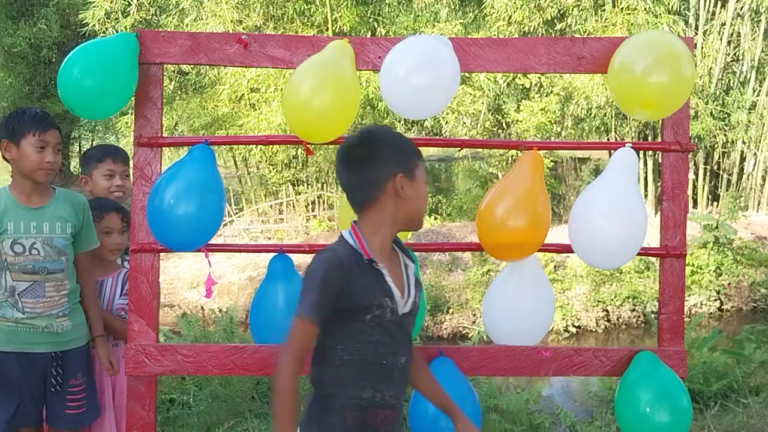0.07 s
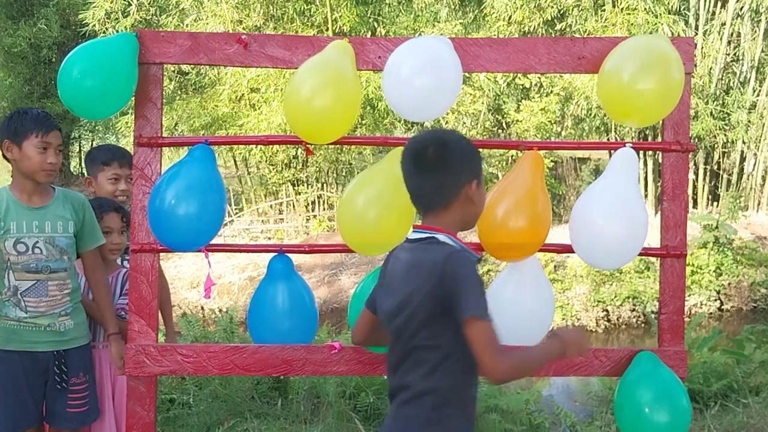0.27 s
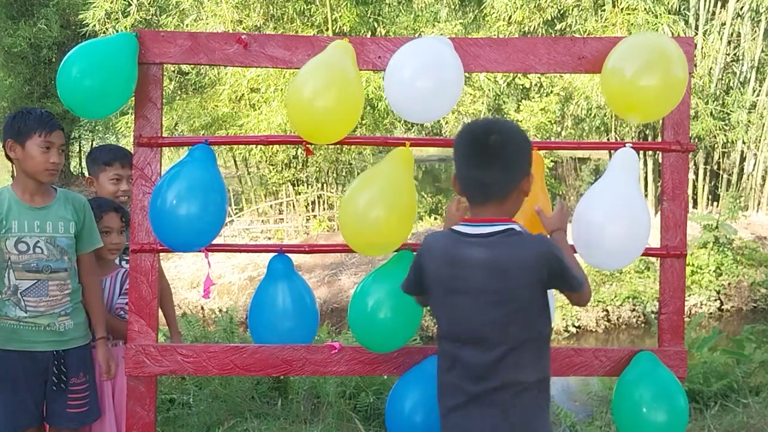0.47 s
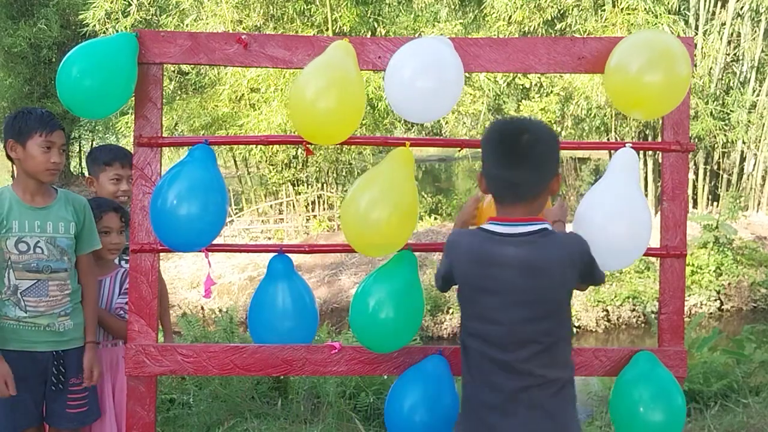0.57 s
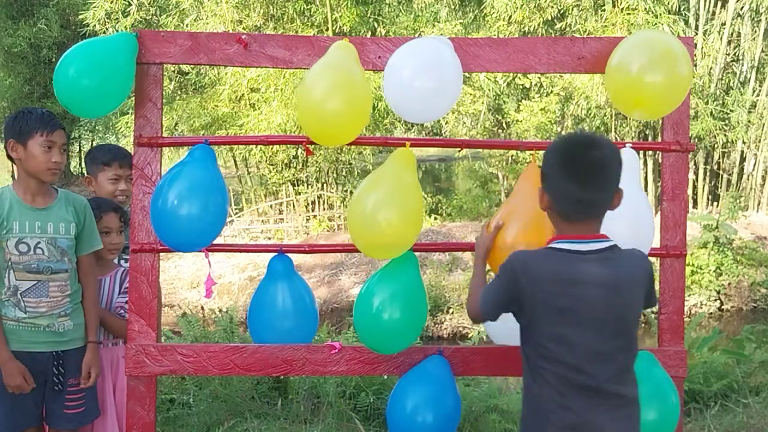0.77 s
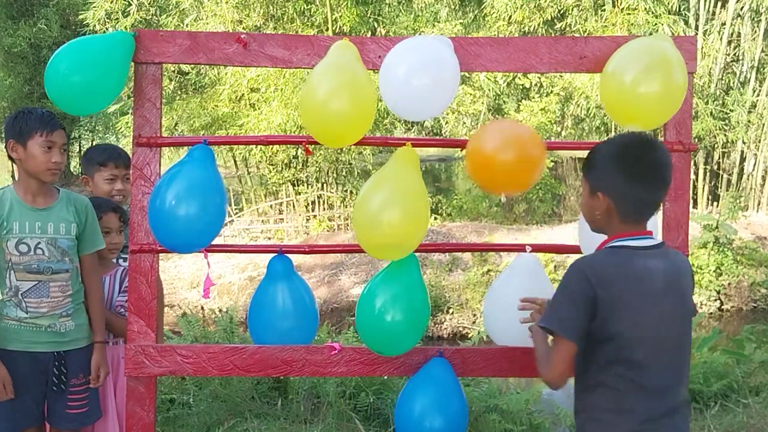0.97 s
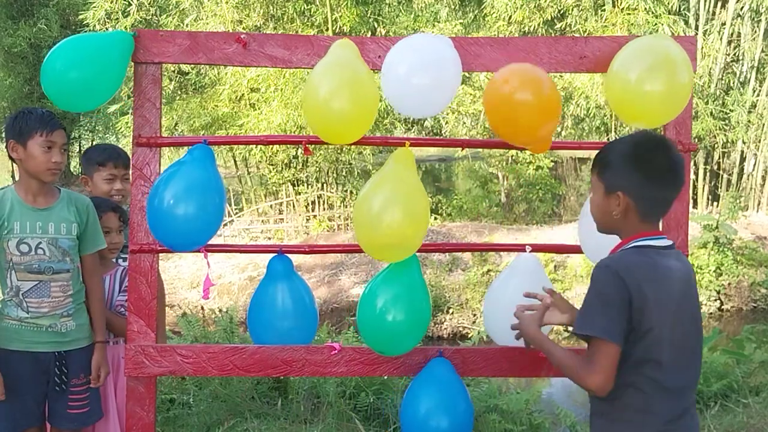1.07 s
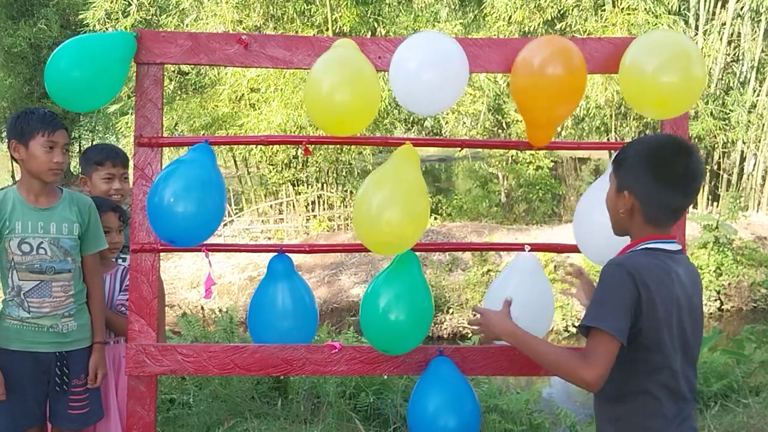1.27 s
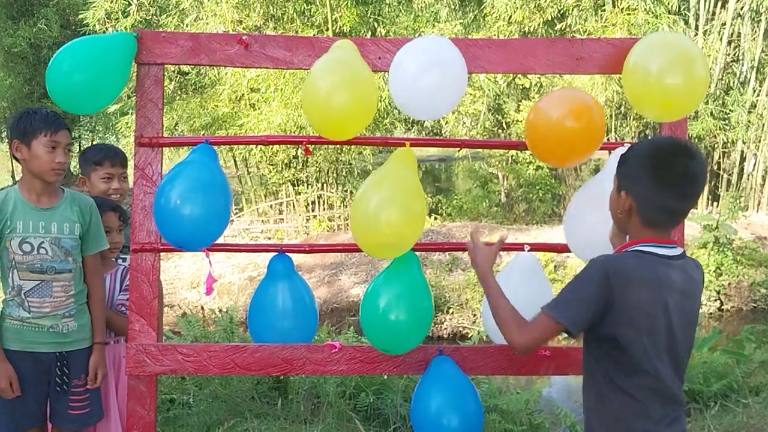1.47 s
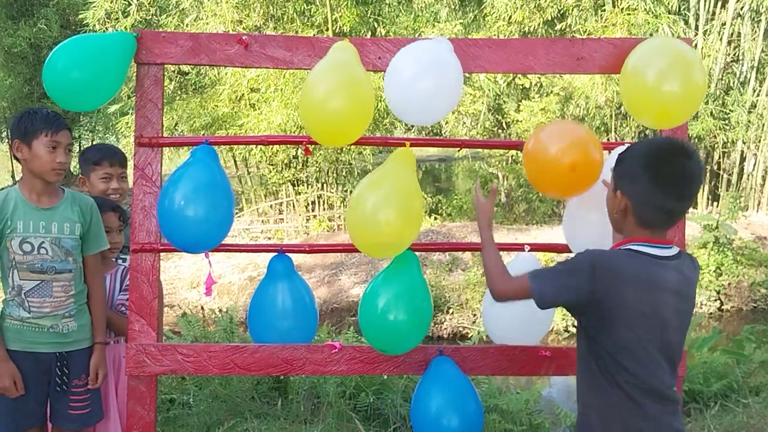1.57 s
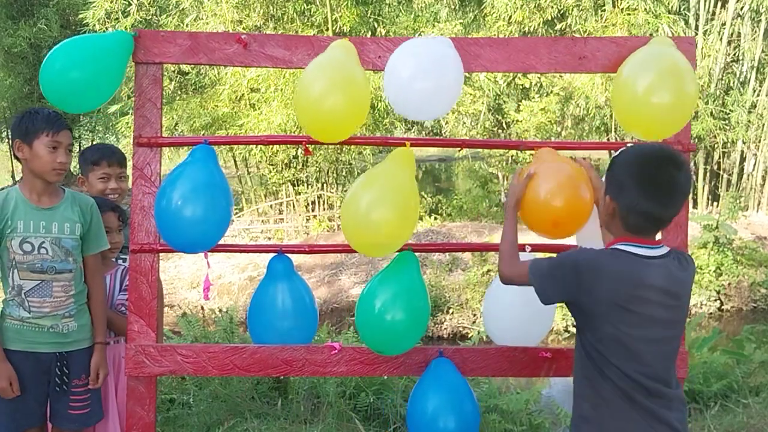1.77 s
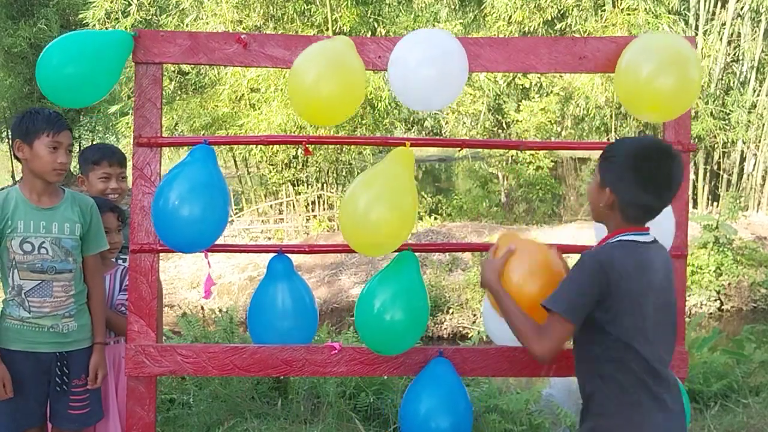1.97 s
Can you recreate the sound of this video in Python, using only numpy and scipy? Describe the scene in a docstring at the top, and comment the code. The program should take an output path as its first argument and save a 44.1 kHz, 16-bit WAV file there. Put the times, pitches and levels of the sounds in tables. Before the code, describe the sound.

A balloon bursts with one sharp, thumping pop and a quick echo at about 2 seconds, much louder than everything else. Before it comes a small rubber squeak at the start, then soft hollow taps and rubbing from 0.5 to 0.8 seconds and from 1 to 1.8. Clothes swish and a foot lands softly near 1 second. Faint insects, a distant bird and a low outdoor rumble lie behind.

```python
"""A rubber balloon is batted and rubbed on a wooden frame outdoors, then squeezed until it bursts.
The pop is a falling thump of released air with a tearing crack and quick echoes off ground and frame.
Before it, a child's taps ring the balloon softly, rubber sticks and slips, clothes swish, a foot lands.
Insects, a far bird and a low rumble are faint behind."""
import sys
import numpy as np
from scipy import signal
from scipy.fft import rfft, irfft, next_fast_len
from scipy.io import wavfile

SR = 44100
rng = np.random.default_rng(int(sys.argv[2]) if len(sys.argv) > 2 else 0)


def generate_wav(signal):
    """Clip the signal to [-1, 1] and save it as 16-bit WAV at the path in sys.argv[1]."""
    frames = np.transpose(np.atleast_2d(signal))
    scaled = np.clip(frames, -1, 1) * 32767
    pcm = np.round(scaled).astype(np.int16)
    wavfile.write(sys.argv[1], SR, pcm)


N = 88420

POP_S = 1.9715
SKIN_HZ = 768.5


def amp(db):
    """Decibels to gain."""
    return 10 ** (np.asarray(db) / 20)


def unit(x):
    """Scale to rms 1."""
    return x / np.sqrt(np.mean(x ** 2) + 1e-20)


def along(points, hz):
    """Interpolate (Hz, value) points on a log axis."""
    knots_hz, values = np.transpose(points)
    return np.interp(np.log(hz + 1), np.log(knots_hz + 1), values)


def since(start_s):
    """Seconds after the start, zero before."""
    return np.maximum(np.arange(N) / SR - start_s, 0)


def level(points):
    """Gain per sample from (s, dB) points."""
    return amp(np.interp(since(0), *np.transpose(points)))


def strokes(rows):
    """A half-sine swell per (start s, length s, dB) row."""
    return sum(amp(db) * np.sin(np.pi * np.minimum(since(s) / length_s, 1)) for s, length_s, db in rows)


def burst(start_s, db, decay_s):
    """Instant onset, exponential decay."""
    t = since(start_s)
    return amp(db) * (t > 0) * np.exp(-t / decay_s)


def filtered(x, response):
    """Apply a gain given as a function of Hz."""
    size = next_fast_len(N + SR // 2)
    return irfft(rfft(x, size) * response(np.fft.rfftfreq(size, 1 / SR)), size)[..., :N]


def noise(colour, grain=1):
    """Coloured stereo noise of rms 1, near mono in the bass."""
    # Each row: frequency in Hz, left-right correlation.
    likeness = [(50, 0.76), (120, 0.9), (600, 0.4), (1300, 0.37), (2500, 0.09), (5000, -0.13), (15000, 0)]

    def response(hz):
        angle = np.arccos(np.clip(along(likeness, hz), -1, 1)) / 2
        return amp(along(colour, hz)) * [np.cos(angle), np.sin(angle)]
    mid, side = filtered(rng.standard_normal((2, N)) * grain, response)
    return unit(np.array([mid + side, mid - side]))


def band(centre_hz, width_hz):
    """Stereo noise of rms 1 in a Gaussian band."""
    white = rng.standard_normal((2, N))
    return unit(filtered(white, lambda hz: np.exp(-((hz - centre_hz) / width_hz) ** 2 / 2)))


def ring(t, hz, t60_s, rise_s, sag=0, sag_s=0.0032):
    """A damped mode whose pitch settles from hz * (1 + sag) to hz."""
    cycles = hz * (t + sag * sag_s * (1 - np.exp(-t / sag_s)))
    attack = (1 - np.exp(-t / rise_s)) ** 2
    return np.sin(2 * np.pi * cycles) * attack * np.exp(-np.log(1000) * t / t60_s)


def outdoors():
    """Still air, a low rumble and a distant rush near 1 kHz."""
    # Each row: frequency in Hz, gain in dB.
    air_colour = [(50, -9), (100, 0.5), (250, -29.5), (600, -20), (1000, -24), (1700, -24), (3000, -26.5),
                  (6000, -19), (7500, -38.5), (9500, -34), (12000, -24), (15500, -34)]
    rumble_colour = [(20, -28), (40, -12.5), (62, 1), (105, -6.5), (160, -10.5), (300, -23.5), (600, -41),
                     (2000, -120)]
    rush_colour = [(400, -55), (800, -13), (950, -3), (1170, -3.5), (1400, -26), (4000, -120)]
    # Each row: time in seconds, level in dB.
    rumble_levels = [(0, -55), (.21, -59), (.39, -62.5), (.58, -57), (.7, -45.5), (.79, -61), (.978, -58.5),
                     (1.0, -52), (1.22, -54.5), (1.43, -42), (1.54, -52), (1.734, -56), (1.772, -43.5),
                     (1.9, -53)]
    # Each row: start in seconds, length in seconds, level in dB.
    rushes = [(-.06, 0.18, -59.5), (.03, 0.35, -69), (.34, 0.09, -63), (.74, 0.11, -65)]
    air = amp(-69.5) * noise(air_colour)
    rumble = level(rumble_levels) * noise(rumble_colour)
    return air + rumble + strokes(rushes) * noise(rush_colour)


def trill(centre_hz, width_hz, wing_hz=105, depth=0.92):
    """A tone of wandering pitch, pulsed by wing strokes."""
    pulse = 1 + depth * np.sin(2 * np.pi * (wing_hz * since(0) + rng.random()))
    phase = np.angle(signal.hilbert(band(centre_hz, width_hz)))
    return pulse * unit(np.cos(phase))


def insects():
    """A high chorus, one nearer buzzing insect and a chirping cricket."""
    # Each row: time in seconds, level in dB.
    chorus_levels = [(0, -71), (.9, -73.5), (1.3, -68.5), (1.5, -65.5), (2, -65.5)]
    # Each row: start in seconds, length in seconds, level in dB.
    buzzes = [(.13, 0.109, -71.5), (.3, 0.17, -73), (.51, 0.19, -68), (.765, 0.2, -69.5)]
    chirps = [(.262, 0.04, -69.5), (0.324, 0.046, -69.5), (1.422, 0.0473, -66), (1.476, 0.063, -65.5),
              (1.538, 0.064, -65), (1.61, 0.0607, -64.5)]
    chorus = band(10280, width_hz=510) + amp(-5.5) * band(8350, width_hz=1800)
    buzz = strokes(buzzes) * trill(10680, width_hz=170)
    cricket = strokes(chirps) * trill(5700, width_hz=115)
    return level(chorus_levels) * chorus + buzz + cricket


def bird():
    """Thin, falling far notes, blurred by the trees."""
    # Each row: start and length in seconds, level in dB, pitch in Hz, slide in Hz/s, blur in Hz.
    whistles = [(1.3, 0.196, -66.5, 6070, -1200, 360), (1.625, 0.19, -72, 4300, -5500, 100),
                (1.33, 0.2, -77, 3865, -1200, 100)]
    out = np.zeros((2, N))
    for start_s, length_s, db, hz, slide_hz_per_s, blur_hz in whistles:
        note = signal.hilbert(band(hz, blur_hz))
        glide = np.exp(1j * np.pi * slide_hz_per_s * since(start_s) ** 2)
        out += strokes([(start_s, length_s, db)]) * np.real(note * glide)
    return out


def footfall():
    """A foot thuds softly on grass."""
    # Each row: start in seconds, level in dB, pitch in Hz.
    steps = [(0.997, -38, 56.2)]
    return sum(amp(db) * ring(since(s), hz, t60_s=0.23, rise_s=0.0048) for s, db, hz in steps)


def rubbing(slips_per_s=2200, spread_db=1.5):
    """Rubber scuffs in stick-slip grains; palms slide and sleeves swish more smoothly."""
    # Each row: start in seconds, length in seconds, level in dB.
    scuffs = [(.445, .07, -63), (.992, 0.046, -57), (1.03, 0.11, -56.5), (1.105, 0.12, -55.5),
              (1.225, 0.0368, -59.5), (1.3, 0.074, -57.5), (.37, .11, -71), (.74, 0.19, -65.5),
              (1.77, 0.0373, -59)]
    slides = [(-.03, 0.088, -53.5), (.03, 0.22, -63), (.2, 0.062, -64.5), (.5, 0.072, -58.5),
              (.55, 0.24, -60.5), (.663, 0.034, -50.5), (.686, 0.029, -48), (1.0, 0.36, -64.5),
              (1.21, 0.12, -56.5), (1.32, 0.22, -66), (1.75, 0.19, -62)]
    swishes = [(.1, 0.14, -65.5), (.49, 0.32, -62), (.95, 0.17, -63.5), (1.18, 0.1854, -54.5),
               (1.66, 0.37, -60), (1.8, 0.1, -58)]
    # Each row: frequency in Hz, gain in dB.
    scuff_colour = [(250, -5.5), (560, 2.5), (950, -0.5), (1300, -4.5), (1700, -6.5), (2400, -13),
                    (4000, -16), (6500, -22), (15000, -26)]
    slide_colour = [(300, -5.5), (650, -3), (950, -6), (1300, -1.5), (1750, 0), (2250, 0.5), (2700, 0),
                    (3300, -1), (5000, -3.5), (6500, -15.5), (15000, -22.5)]
    swish_colour = [(300, 13), (1000, 1), (3000, -1.5), (7000, 0), (13000, 0), (16000, -4.5)]
    grains = (rng.random(N) < slips_per_s / SR) * amp(spread_db * rng.standard_normal(N))
    rubber = strokes(scuffs) * noise(scuff_colour, grains)
    palms = strokes(slides) * noise(slide_colour)
    clothes = strokes(swishes) * noise(swish_colour)
    return rubber + palms + clothes


def drones():
    """Friction keeps the balloon and its skin ringing unevenly."""
    # Each row: start in seconds, length in seconds, level in dB, pitch in Hz.
    rubs = [(0.068, 0.16, -54.5, 206), (0.437, 0.237, -53.5, 331), (0.575, 0.23, -54, 319),
            (0.994, 0.17, -48.5, 236), (1.108, 0.315, -47, 241), (1.363, 0.27, -53.5, 250)]
    out = np.zeros(N)
    for start_s, length_s, db, hz in rubs:
        body = band(hz, width_hz=30)[0]
        skin = amp(-20) * band(SKIN_HZ, width_hz=110)[0]
        out += strokes([(start_s, length_s, db)]) * (body + skin)
    return out


def ticks():
    """Taut rubber flicks free of a finger."""
    # Each row: start in seconds, level in dB, centre in Hz, decay in seconds.
    flicks = [(0.9925, -56.5, 4420, 0.011), (1.029, -56.5, 7200, 0.0022), (1.034, -52, 5800, 0.0086),
              (1.0675, -49, 6810, 0.0026)]
    return sum(burst(s, db, decay_s) * band(hz, width_hz=830) for s, db, hz, decay_s in flicks)


def slips(events, modes, rise_s=0.00062):
    """Sudden slips drive the balloon's resonances with decaying noise."""
    # Each row: frequency in Hz, gain in dB.
    friction_colour = [(300, 9), (700, -1.5), (5000, -2.5), (7000, -10), (15000, -14)]

    def body(hz):
        return sum((-1) ** k * amp(db) * 1j * hz * width_hz / (mode_hz**2 - hz**2 + 1j * hz * width_hz)
                   for k, (mode_hz, width_hz, db) in enumerate(modes))
    force = sum(burst(s, db, decay_s) * (1 - np.exp(-since(s) / rise_s)) for s, db, decay_s in events)
    return force * unit(filtered(noise(friction_colour), body))


def finger_slips():
    """Fingers catch and slip free with a hollow sound, or drag with a squeak."""
    # Each row: start in seconds, level in dB, decay in seconds.
    catches = [(1.0257, -49.5, 0.0098), (1.0327, -46.5, 0.012), (1.0712, -38.5, .010),
               (1.1085, -50.5, 0.0094), (1.123, -45.5, 0.0088), (1.143, -46.5, 0.0058),
               (1.1704, -52, 0.012), (1.2397, -49.5, 0.012), (1.3285, -47, 0.01)]
    squeaks = [(0.001, -42, 0.014), (.025, -59, 0.023), (.043, -52, 0.0078)]
    # Each row: centre in Hz, width in Hz, gain in dB.
    hollow_modes = [(660, 98, -1.5), (996, 84, -6.5), (1267, 90, 1.5), (1667, 110, 1), (1800, 230, -4.5),
                    (3540, 350, -14.5)]
    squeak_modes = [(920, 120, 0.5), (2040, 140, -0.5), (2370, 125, -3), (2924, 246, -12), (4145, 255, -14),
                    (5004, 350, -16)]
    return slips(catches, hollow_modes) + slips(squeaks, squeak_modes)


def taps():
    """Each touch gives a dull push and rings the balloon and its skin."""
    # Each row: start in seconds, push in dB, ring in dB, ring pitch in Hz, skin in dB.
    touches = [(0.502, -35, -46, 346, -52), (0.533, -31.5, -41, 331, -74), (0.55, -33.5, -41, 335, -49),
               (.577, -33.5, -39, 321.7, -49), (0.603, -30, -63, 337, -49.5),
               (0.6313, -25, -32, 322, -52.5), (0.6587, -31.5, -47, 322, -43.5),
               (0.693, -28.5, -40, 313, -70), (0.732, -35.5, -44.5, 324, -56),
               (0.995, -43, -35.5, 225, -46), (1.027, -26, -49, 216, -47), (1.07, -53, -41, 270, -50),
               (1.17, -33, -43, 220, -58.5), (1.261, -44, -32, 250, -68.5), (1.306, -39, -41.5, 217, -58),
               (1.33, -31, -35.5, 272.1, -73), (1.343, -57.5, -31.5, 234, -52.5),
               (1.369, -35, -33.5, 248, -50.5), (1.388, -40, -24, 251.3, -54),
               (1.414, -54.5, -25.5, 258, -55), (1.448, -47.5, -27.5, 234.5, -53),
               (1.488, -44.5, -32.5, 257.5, -54), (1.534, -54.5, -30.5, 251, -65),
               (1.754, -41.5, -55, 213, -61.5), (1.782, -44, -41, 201, -56)]
    out = np.zeros(N)
    for start_s, push_db, ring_db, ring_hz, skin_db in touches:
        t = since(start_s)
        out += amp(push_db) * ring(t, hz=199, t60_s=0.023, rise_s=0.00054)
        out += amp(ring_db) * ring(t, ring_hz, t60_s=0.076, rise_s=0.0037)
        out += amp(skin_db) * ring(t, SKIN_HZ, t60_s=0.053, rise_s=0.0012)
    return out


def air_blast(t):
    """Released air thumps; its lowest modes fall steeply in pitch."""
    # Each row: final pitch in Hz, level in dB, T60 and rise in seconds, starting pitch offset as a ratio.
    modes = [(155, -10, 0.11, 0.00692, 4.5), (85.3, -19, 0.148, 0.00476, 4.5),
             (248, -9.5, 0.062, 0.0012, -0.08), (645, -19.5, 0.056, 0.0006, 0),
             (510.4, -26.5, 0.13, 0.003, 1.5), (1217, -37, 0.063, 0.0016, 1), (1334, -36, 0.13, 0.0048, -1),
             (1970, -45.5, 0.13, 0.0023, -0.5), (2140, -42.5, 0.13, 0.00274, 1),
             (2490, -53, 0.132, 0.0022, -1)]
    return sum(amp(db) * ring(t, hz, t60_s, rise_s, sag) for hz, db, t60_s, rise_s, sag in modes)


def pop(tear_rise_s=0.0051, tear_decay_s=0.0046, scatter_t60_s=0.47):
    """The skin rips and whips back, the air thumps out, ground and frame echo."""
    # Each row: delay in seconds, gain in dB.
    echoes = [(.0096, -15), (.0164, -7.5)]
    # Each row: start in seconds, level in dB, decay in seconds.
    snaps = [(1.9704, -48, 0.0043), (1.9729, -36.5, 0.0016), (1.9764, -31, 0.00069)]
    # Each row: frequency in Hz, gain in dB.
    tear_colour = [(300, 0), (700, 6.5), (1300, -0.5), (2000, -4), (3200, -7), (4600, -5.5), (6500, -16.5),
                   (15000, -18)]
    snap_colour = [(1000, -12.5), (4000, 10), (7000, -1.5), (13000, 10.5), (16000, -2)]
    t = since(POP_S)
    thump = air_blast(t) + sum(amp(db) * air_blast(since(POP_S + delay_s)) for delay_s, db in echoes)
    opening = np.minimum(t / tear_rise_s, 1)
    tear = amp(-30) * opening * np.exp(-since(POP_S + tear_rise_s) / tear_decay_s) * noise(tear_colour)
    scatter = amp(-39) * opening * np.exp(-np.log(1000) * t / scatter_t60_s) * noise(tear_colour)
    crack = sum(burst(*snap) for snap in snaps) * noise(snap_colour)
    return thump + tear + scatter + crack


def scene():
    """The mix sits a little to the right."""
    # Each row: frequency in Hz, left minus right in dB.
    balance = [(60, -2.5), (250, -2.5), (600, -5.5), (1300, 0), (2500, -2.5), (5000, -1), (10000, -6.5),
               (15000, -7)]
    handling = taps() + drones() + rubbing() + ticks() + finger_slips()
    mix = pop() + handling + footfall() + insects() + bird() + outdoors()
    return filtered(mix, lambda hz: amp(along(balance, hz) * np.array([[.5], [-.5]])))


def record(dry):
    """Thin the deep bass and cut the top treble."""
    low_cut_hz, top_hz = 73, 15750
    thinned = signal.sosfilt(signal.butter(2, low_cut_hz, "highpass", fs=SR, output="sos"), dry)
    return filtered(thinned, lambda hz: hz < top_hz)


dry = scene()
out = record(dry)
generate_wav(out)
```